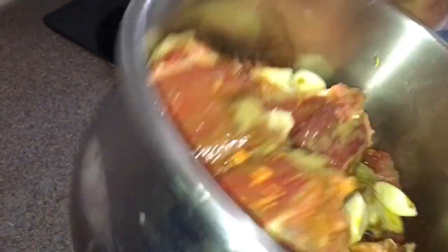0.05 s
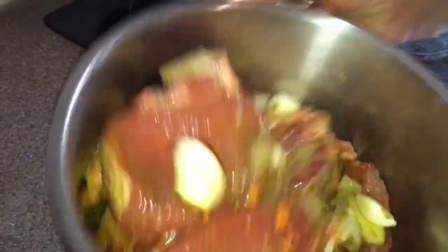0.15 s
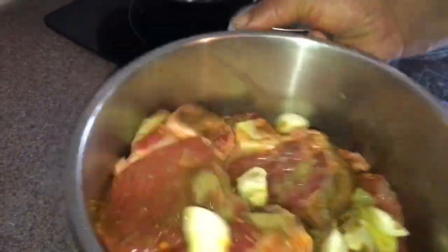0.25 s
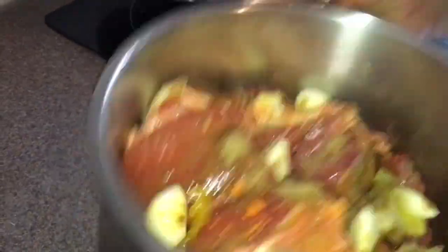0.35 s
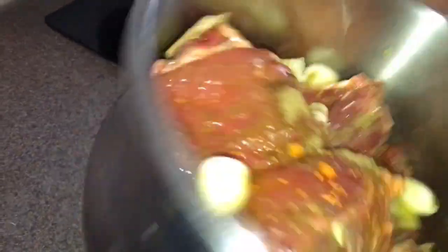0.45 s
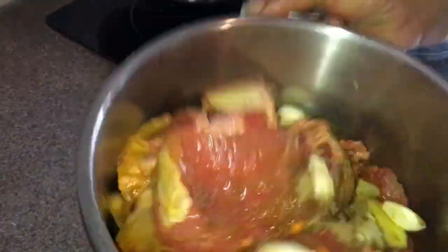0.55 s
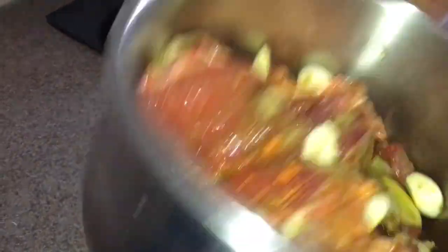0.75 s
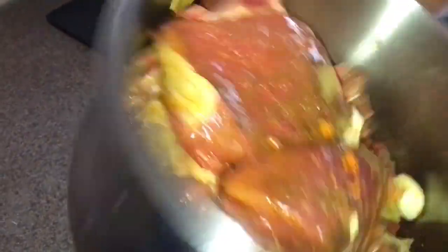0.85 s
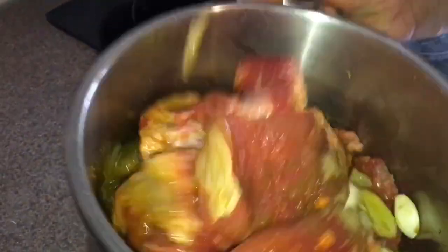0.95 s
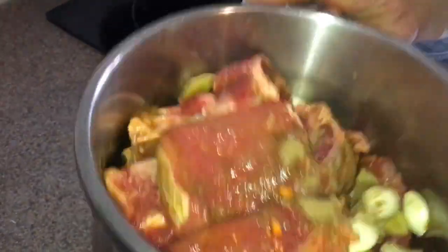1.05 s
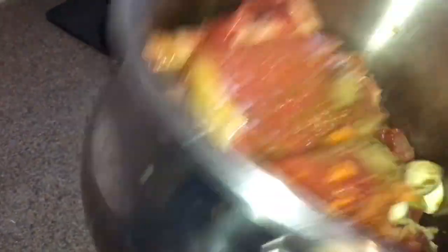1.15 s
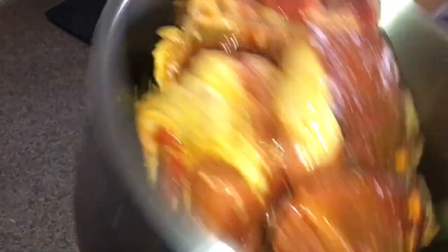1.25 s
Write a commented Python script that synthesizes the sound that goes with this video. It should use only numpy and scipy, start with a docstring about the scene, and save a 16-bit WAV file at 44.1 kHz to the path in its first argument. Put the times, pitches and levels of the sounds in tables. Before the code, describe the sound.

Three squishy slaps of raw meat and garlic come from a shaken steel pot, heard close up over a faint kitchen hum. Air pockets pop with each landing, and a short slide leads into the last, with its light metallic ring.

```python
"""A small kitchen: wet raw meat and garlic are tossed three times in a steel pot.
The pieces peel off, slide and slap back; trapped air pops out between them,
the base thuds and the steel wall rings briefly.
Juice crackles throughout, over a faint mains hum and room rumble."""
import sys
import numpy as np
from scipy import signal
from scipy.fft import rfft
from scipy.io import wavfile
from scipy.ndimage import uniform_filter1d

SR = 44100
rng = np.random.default_rng(int(sys.argv[2]) if len(sys.argv) > 2 else 0)


def file_out(sig):
    """Save sig as 16-bit WAV at sys.argv[1]."""
    # one column per channel
    cols = np.atleast_2d(sig).T
    # limit, then scale
    lim = np.clip(cols, -1, 1)
    pcm = np.round(lim * 32767).astype(np.int16)
    wavfile.write(sys.argv[1], SR, pcm)


N = 57330
T = np.arange(N) / SR

# spectrum of tearing juice films: freq_hz, level_db
TEAR_SPECTRUM = [(600, -14), (2000, 6), (6000, 0.5), (9000, 0), (16000, 0.5)]


def slaps():
    """Each landing squishes with a hollow body, a smack and a spray of bursting bubbles."""
    # landings: start_s, attack_s, t60_s, body_db, smack_db, spray_db
    landings = [(0.194, 0.00186, 0.06, -41, -48.5, -59.5), (0.218, 0.0012, 0.22, -43, -46.5, -38),
                (0.2284, 0.0025, 0.1814, -33.5, -30, -74.5), (0.273, 0.00026, 0.0874, -25.5, -25.5, -39),
                (0.291, 0.007, 0.0234, -40, -27.5, -28.5), (0.306, 0.0087, 0.081, -19.5, -25.5, -24.5),
                (0.321, 0.00585, 0.0483, -20, -22.5, -29.5), (0.357, 0.0029, 0.57, -67, -45, -56),
                (0.416, 0.00087, 0.0447, -43, -27.5, -38.5), (0.5722, 0.0019, 0.1671, -41.5, -44, -36),
                (.581, 0.00054, 0.0642, -36, -27, -37), (0.592, 0.00057, 0.0959, -41, -34.5, -43.5),
                (0.62, 0.00096, 0.0407, -40, -56, -27.5), (0.652, 0.003, 0.95, -41.5, -62, -57),
                (0.707, 0.00837, 0.0159, -22.5, -27.5, -35.5), (0.7197, 0.00382, 0.0471, -21, -14.5, -21),
                (0.742, 0.0043, 0.1, -27, -27.5, -32.5), (0.7617, 0.00174, 0.0342, -25, -23.5, -36),
                (0.7704, 0.00097, 0.0342, -47.5, -24, -27.5), (0.79, 0.00163, 0.0969, -40.5, -34, -42.5),
                (.809, 0.00166, 0.06, -70.5, -60.5, -59), (1.053, 0.0027, 0.18, -30, -35, -52.5),
                (1.089, 0.00644, 0.044, -60.5, -35.5, -28.5), (1.1019, 0.00083, 0.031, -25.5, -18.5, -19.5),
                (1.11, 0.00145, 0.1444, -28, -24, -30.5), (1.162, 0.00144, 0.2, -46, -45.5, -50.5)]
    # spectra of the three parts: freq_hz, level_db
    body_spectrum = [(150, -21), (300, -17), (450, -5.5), (600, 3), (730, -6), (1050, 6.5), (1300, -9),
                     (1700, -5.5), (3000, -75)]
    smack_spectrum = [(700, -31.5), (1250, -1), (1650, 1.5), (2100, 1), (2550, -5.5), (3400, -12),
                      (4400, -8), (8000, -59.5)]
    spray_spectrum = [(1800, -44.5), (2900, -6), (3600, 0), (4800, -4.5), (5700, 1.5), (7500, -5.5),
                      (10500, -16), (13000, -14.5), (16000, -27.5)]
    spray = squish(spray_spectrum, bubbles(per_s=7900, spread_db=2))
    parts = np.array([squish(body_spectrum), squish(smack_spectrum), spray])
    return sum(burst(start_s, attack_s, t60_s) * (from_db(parts_db) @ parts)
               for start_s, attack_s, t60_s, *parts_db in landings)


def pops():
    """Squeezed-out air pockets swell and ring, their pitch bending as the meat gives."""
    # air pockets: start_s, pitch_hz, level_db, swell_s, t60_s
    pockets = [(.2292, 915.4, -19.5, 0.00071, 0.0295), (.2338, 813.7, -18.5, 0.00102, 0.1314),
               (.2487, 6090, -27.5, 0.00064, 0.0197), (.249, 1875, -20, 0.00093, 0.032),
               (.2497, 5016, -22, 0.00106, 0.0248), (.257, 624.4, -16, 0.00069, .024),
               (.2742, 975.5, -15.5, 0.00053, 0.059), (.276, 602.3, -23, 0.0016, 0.194),
               (.291, 1135, -12, 0.00144, 0.0246), (.2945, 2026, -14, 0.0021, 0.0625),
               (.3074, 1143, -2.5, 0.00094, 0.019), (.311, 341, -27, 0.00154, 0.084),
               (.3191, 1113, 1.5, 0.00142, 0.0227), (.3255, 1082, 2.5, 0.00215, 0.0245),
               (.3336, 964, -10.5, 0.00144, 0.0247), (.4178, 1164, -2, 0.001184, 0.0161),
               (.5815, 1590, -25, 0.00078, 0.0363), (.5817, 676, -20.5, 0.00071, 0.0456),
               (.5818, 420, -27.5, 0.0009, 0.1324), (.586, 912, -20.5, 0.00079, 0.0395),
               (.622, 1370, -25.5, 0.00084, 0.031), (.6222, 422.5, -18.5, 0.00064, 0.0245),
               (.6298, 463.4, -11, 0.00145, 0.0244), (.6305, 979, -21, .0008, 0.0254),
               (.631, 778.5, -28, 0.00134, 0.0844), (.674, 1076, -29.5, 0.0025, 0.016),
               (.7123, 1104, -27.5, 0.0027, 0.054), (.7219, 597.5, -6, 0.00123, 0.0306),
               (.7252, 1675, 1.5, 0.00195, 0.0193), (.7225, 2040, -11.5, 0.00114, 0.03),
               (.732, 1138, -3.5, 0.00134, 0.0193), (.7392, 925, -9, 0.00061, 0.0216),
               (.7515, 1106, -7, 0.00142, 0.029), (.7705, 1090, -13.5, 0.0019, 0.0204),
               (1.0171, 590.2, -12.5, 0.0023, 0.0419), (1.0176, 895, -14, 0.00107, 0.0208),
               (1.019, 1426, -18, 0.00124, 0.0151), (1.0217, 483, -9.5, 0.00142, 0.01346),
               (1.0555, 612.4, -16.5, 0.0017, 0.0364), (1.068, 1650, -17, 0.00061, 0.0226),
               (1.1013, 1110, -2.5, 0.00132, 0.0155), (1.1021, 559.8, -15.5, 0.0015, 0.0263),
               (1.1125, 1117, -3.5, 0.00101, 0.0132), (1.118, 257.2, -31.5, 0.00205, 0.1),
               (1.166, 673.7, -21, 0.002, 0.0496)]
    bend_share, bend_step_s = 0.0224, 0.00343
    knots_s = np.arange(100) * bend_step_s

    def pop(t, hz, swell_s, t60_s):
        bend = bend_share * np.interp(t, knots_s, rng.standard_normal(len(knots_s)))
        phase = 2 * np.pi * hz * (t + np.cumsum(bend) / SR)
        return (1 - np.exp(-t / swell_s)) * decay(t, t60_s) * np.sin(phase)
    return sum(from_db(db) * placed(start_s, 2 * t60_s, lambda t: pop(t, hz, swell_s, t60_s))
               for start_s, hz, db, swell_s, t60_s in pockets)


def snaps():
    """Sticky films of juice tear with a bright snap."""
    # tears: start_s, level_db, t60_s, centre_hz, width_hz
    tears = [(0.2487, -28, 0.0233, 6500, 4000), (0.2971, -29, 0.0075, 6440, 2000),
             (0.309, -28.5, 0.108, 10000, 8300), (0.3258, -24, 0.0124, 6000, 2000),
             (.399, -41.5, 0.011, 5470, 2490), (.456, -33, 0.0315, 5830, 2020),
             (0.576, -34, 0.0184, 6070, 1800), (0.621, -27.5, 0.052, 5127, 500),
             (0.6218, -30, 0.0216, 2790, 710), (0.6233, -30, 0.026, 3500, 450),
             (0.6555, -29.5, 0.0228, 4140, 1400), (0.7249, -40.5, 0.0085, 4960, 5000),
             (0.7686, -29, 0.0275, 6670, 2480), (0.84, -42, 0.0157, 5470, 2410),
             (1.0132, -34, 0.0474, 5020, 1810), (1.0539, -34, 0.025, 3200, 800),
             (1.1019, -20.5, 0.011, 4200, 2000), (1.163, -35.5, 0.027, 6200, 2510)]
    attack_s = 0.000258
    tearing = squish(TEAR_SPECTRUM)
    return sum(from_db(db) * burst(start_s, attack_s, t60_s) * unit_rms(bandpass(tearing, hz, width_hz))
               for start_s, db, t60_s, hz, width_hz in tears)


def pot_wall(contact):
    """Wall and cavity modes, damped by the meat, ring clearly only at one knock on bare steel."""
    # modes: freq_hz, contact_gain_db, t60_s, knock_db
    modes = [(299.1, 6, 0.63, -62.5), (443.7, 0, 0.1125, -57.5), (624.9, -5, 0.148, -58.5),
             (770.2, -1.5, 0.089, -53), (967.3, -5.5, 0.103, -36), (1135.2, -2.5, 0.146, -43.5),
             (1277.8, -1.5, 0.103, -51.5), (1631, -3, 0.172, -39.5), (1683.6, -18, 0.19, -24.5),
             (1852, -19, 0.225, -63), (2055, -6.5, 0.186, -46), (2191, 3, 0.087, -44),
             (2353, -4, 0.275, -34.5), (2652, -23.5, 0.135, -28.5), (2874.5, 6, 0.1383, -18.5),
             (3500, -2.5, 0.038, -16), (5345, 2.5, 0.065, -31.5)]
    knock_s = 1.1012
    return sum(from_db(gain_db) * ring(contact, hz, t60_s)
               + from_db(knock_db) * struck(knock_s, hz, t60_s)
               for hz, gain_db, t60_s, knock_db in modes)


def thuds():
    """Weight lands on the base, which answers with low, damped modes."""
    # impacts: start_s, level_db
    impacts = [(.255, -29), (0.623, -36.5), (0.635, -29.5), (0.719, -51), (1.017, -20.5), (1.104, -43)]
    # base modes: freq_hz, gain_db, t60_s
    modes = [(81, -3, 0.0665), (120.1, -1, 0.0451), (245.6, -2.5, 0.025)]
    return sum(from_db(db + gain_db) * struck(start_s, hz, t60_s) * (-1) ** k
               for start_s, db in impacts for k, (hz, gain_db, t60_s) in enumerate(modes))


def slide():
    """Meat peels off with a thin hiss and slides over the steel before the last landing."""
    # friction level: time_s, level_db
    friction_levels = [(.885, -89), (.912, -40.5), (.929, -28.5), (.951, -30.5), (.964, -43), (1.01, -58)]
    # friction spectrum: freq_hz, level_db
    friction_spectrum = [(150, -26), (300, -7.5), (750, -6.5), (1350, -11.5), (1700, -1), (2230, -1),
                         (2520, -9.5), (2930, -0.5), (3200, -10.5), (3600, -5.5), (4200, -2.5),
                         (4850, -12.5), (5300, -4), (6400, -19.5), (8300, -20), (16000, -32)]
    hiss = unit_rms(bandpass(squish(TEAR_SPECTRUM), hz=7840, width_hz=1440))
    peel = from_db(-40.5) * burst(start_s=0.899, attack_s=0.0162, t60_s=0.112) * hiss
    sliding = (T > friction_levels[0][0]) & (T < friction_levels[-1][0])
    return peel + sliding * envelope(friction_levels) * noise(friction_spectrum)


def ticks():
    """Threads of juice part, each with one thin click of a few cycles."""
    # threads: start_s, level_db, pitch_hz
    threads = [(0.1557, -15.5, 4340), (.1827, -32.5, 4700), (.615, -27, 10890), (0.813, -24.5, 4470),
               (1.182, -36.5, 6100), (1.29, -35.5, 5100)]
    rise_s = 0.0000866

    def tick(t, hz):
        age = t / rise_s
        return age * np.exp(1 - age) * np.sin(2 * np.pi * hz * t)
    return sum(from_db(db) * placed(start_s, 20 * rise_s, lambda t: tick(t, hz))
               for start_s, db, hz in threads)


def juice():
    """Small bubbles and sticky clicks crackle as the pieces settle."""
    # crackle level: time_s, level_db
    crackle_levels = [(0, -44), (.08, -59), (.19, -51), (.35, -41), (.44, -47), (.53, -56.5), (.61, -45.5),
                      (.69, -41.5), (.80, -41.5), (.87, -55), (1.08, -43), (1.19, -50.5), (1.3, -53)]
    # crackle spectrum: freq_hz, level_db
    crackle_spectrum = [(300, -7.5), (900, 5), (2000, -2.5), (3000, -8), (6000, -11), (10000, -15),
                        (16000, -25.5)]
    fizz = unit_rms(bubbles(per_s=7000, spread_db=3))
    clicks = from_db(-5) * unit_rms(grains(per_s=320, spread_db=4.5))
    return envelope(crackle_levels) * coloured(fizz + clicks, crackle_spectrum)


def bubbles(per_s, spread_db):
    """Tiny bubbles burst at random, each ringing briefly at one of many pitches."""
    clicks = grains(per_s, spread_db)
    grid_hz = np.linspace(500, 15800, 56)
    pitch_index = rng.integers(0, len(grid_hz), N)
    pitches_hz = grid_hz + (grid_hz[1] - grid_hz[0]) * (rng.random(len(grid_hz)) - 0.5)
    return sum(ring(clicks * (pitch_index == k), hz, t60_s=0.0135) for k, hz in enumerate(pitches_hz))


def kitchen(x):
    """The walls return a short diffuse tail."""
    # tail spectrum: freq_hz, level_db
    tail_spectrum = [(100, 2.5), (500, 0), (1500, -1.5), (3000, -1), (6000, -5.5), (16000, -27.5)]
    tail = noise(tail_spectrum) * burst(start_s=0.00677, attack_s=0.0091, t60_s=0.414)
    tail /= np.linalg.norm(tail)
    return from_db(-23.5) * signal.fftconvolve(x, tail)[:N]


def background():
    """Mains hum and room rumble, both fading."""
    # hum partials, rumble spectrum: freq_hz, level_db
    hum_partials = [(100, -3), (150, -15), (200, -15.5), (299, -13)]
    rumble_spectrum = [(20, -36.5), (40, 2), (65, 3.5), (150, 1.5), (400, -6.5), (900, -7), (2000, -19),
                       (6000, -46), (16000, -35.5)]
    # fades: time_s, level_db
    hum_levels = [(0, -45.5), (.2, -45.5), (.62, -46.5), (.8, -52.5), (1.3, -60)]
    rumble_levels = [(0, -49), (.6, -50.5), (1.0, -54), (1.3, -56.5)]
    hum = sum(from_db(db) * np.sqrt(2) * np.sin(2 * np.pi * (hz * T + rng.random()))
              for hz, db in hum_partials)
    return envelope(hum_levels) * hum + envelope(rumble_levels) * noise(rumble_spectrum)


def squish(spectrum, source=None, window_s=0.02):
    """Dense wet grains with a steady short-term level."""
    if source is None:
        source = grains(per_s=7000, spread_db=2)
    wet = coloured(source, spectrum)
    power = uniform_filter1d(wet ** 2, size=int(window_s * SR) + 1)
    return wet / np.sqrt(power + 1e-9)


def grains(per_s, spread_db):
    """Random clicks of uneven size."""
    sizes = from_db(spread_db * np.minimum(rng.exponential(1, N), 5))
    signs = rng.choice([-1, 1], N)
    return sizes * signs * (rng.random(N) < per_s / SR)


def noise(spectrum):
    """Coloured Gaussian noise, rms 1."""
    return coloured(rng.standard_normal(N), spectrum)


def coloured(x, spectrum):
    """Filter by (freq_hz, level_db) points; rms 1."""
    hz, db = np.transpose(spectrum)
    bins_hz = np.maximum(np.fft.rfftfreq(N, 1 / SR), 1)
    gain = from_db(np.interp(np.log(bins_hz), np.log(hz), db))
    return unit_rms(np.fft.irfft(rfft(x) * gain, N))


def bandpass(x, hz, width_hz):
    """Two-pole resonator, peak gain 1."""
    radius = np.exp(-np.pi * width_hz / SR)
    numerator = np.array([1, 0, -1]) * (1 - radius ** 2) / 2
    denominator = [1, -2 * radius * np.cos(2 * np.pi * hz / SR), radius ** 2]
    return signal.lfilter(numerator, denominator, x + 1e-18)


def ring(x, hz, t60_s):
    """One mode driven by x."""
    return bandpass(x, hz, width_hz=np.log(1000) / (np.pi * t60_s))


def struck(start_s, hz, t60_s):
    """One mode after a blow: a decaying sine."""
    return placed(start_s, 2 * t60_s, lambda t: np.sin(2 * np.pi * hz * t) * decay(t, t60_s))


def burst(start_s, attack_s, t60_s):
    """Linear rise, exponential fall."""
    def shape(t):
        return np.minimum(t / attack_s, 1) * decay(np.maximum(t - attack_s, 0), t60_s)
    return placed(start_s, attack_s + 2 * t60_s, shape)


def placed(start_s, length_s, shape):
    """Set shape(time since start) into silence."""
    first, last = np.searchsorted(T, [start_s, start_s + length_s])
    track = np.zeros(N)
    track[first:last] = shape(T[first:last] - start_s)
    return track


def decay(t, t60_s):
    """Fall of 60 dB per t60_s."""
    return np.exp(-np.log(1000) * t / t60_s)


def envelope(points):
    """Gain from (time_s, level_db) points."""
    return from_db(np.interp(T, *np.transpose(points)))


def unit_rms(x):
    return x / np.sqrt(np.mean(x ** 2) + 1e-20)


def from_db(db):
    return 10 ** (np.asarray(db) / 20)


def scene():
    """Meat in the pot, the pot in the kitchen; mono."""
    contact = slaps() + pops() + snaps() + ticks() + slide() + juice()
    direct = contact + pot_wall(contact) + thuds()
    return (direct + kitchen(direct) + background())[None]


def record(dry):
    """Microphone: bass cut, soft clipping, steep treble cut."""
    low_cut_hz, high_cut_hz, ceiling = 57.1, 15900, 0.85
    highpass = signal.butter(2, low_cut_hz, "high", fs=SR, output="sos")
    lowpass = signal.ellip(10, 0.1, 90, high_cut_hz, fs=SR, output="sos")
    x = signal.sosfilt(highpass, dry)
    rounded = x / (1 + (x / ceiling) ** 4) ** 0.25
    return signal.sosfilt(lowpass, rounded)


dry = scene()
out = record(dry)
file_out(out)
```